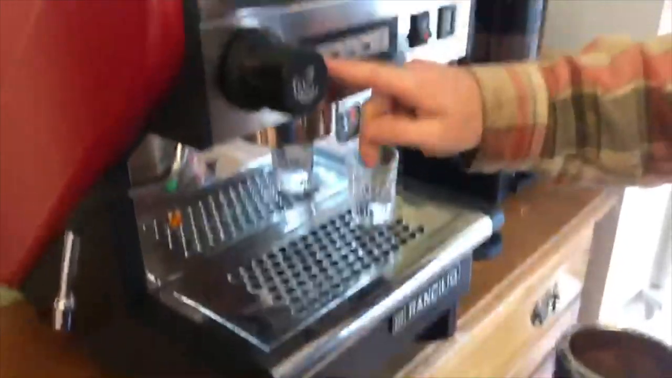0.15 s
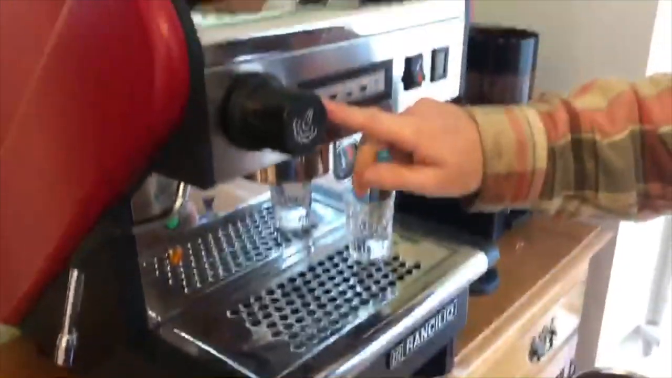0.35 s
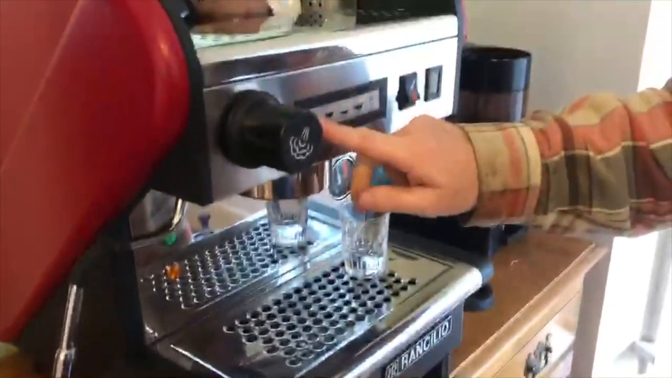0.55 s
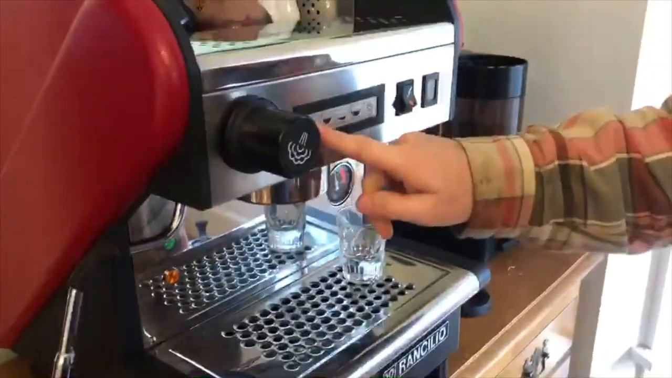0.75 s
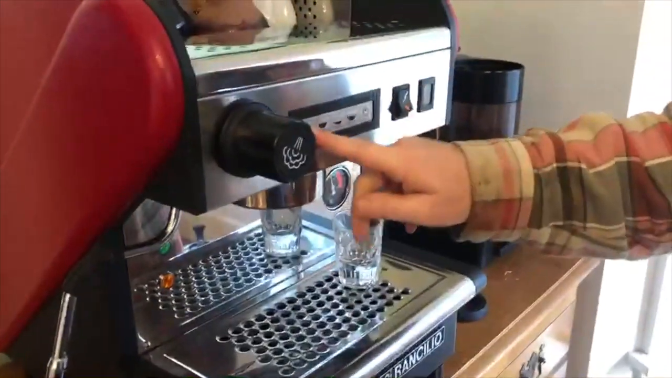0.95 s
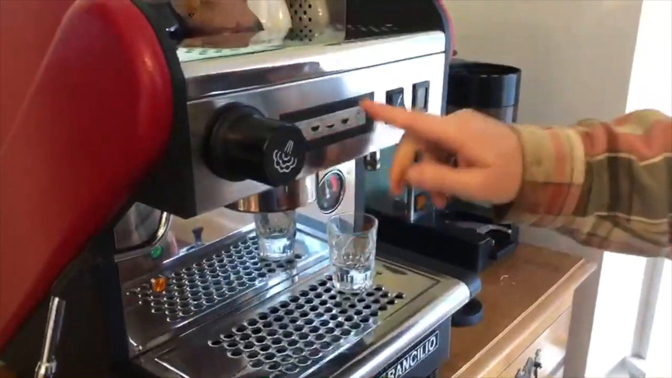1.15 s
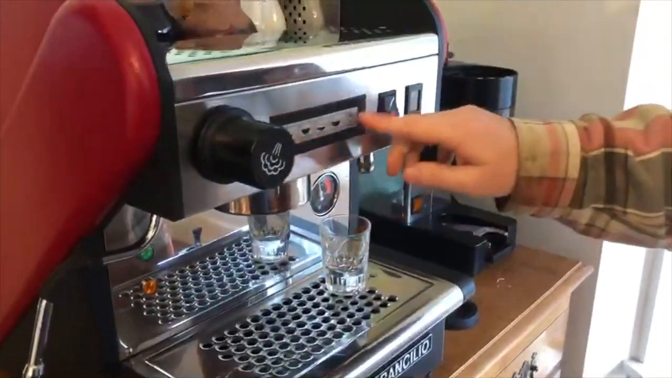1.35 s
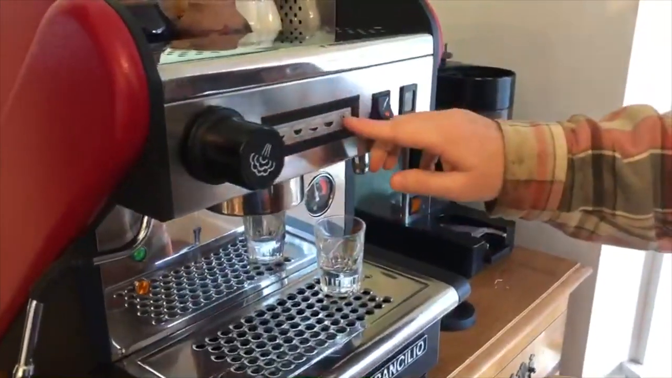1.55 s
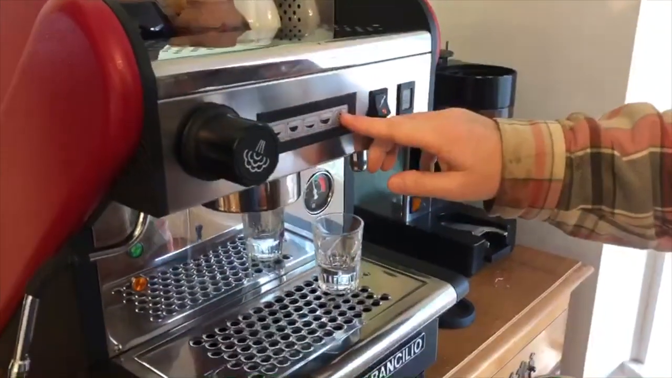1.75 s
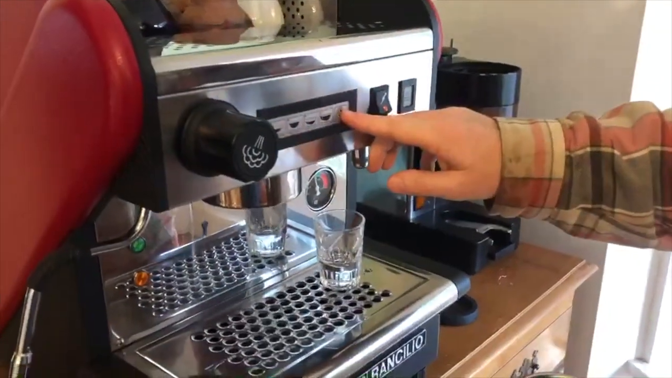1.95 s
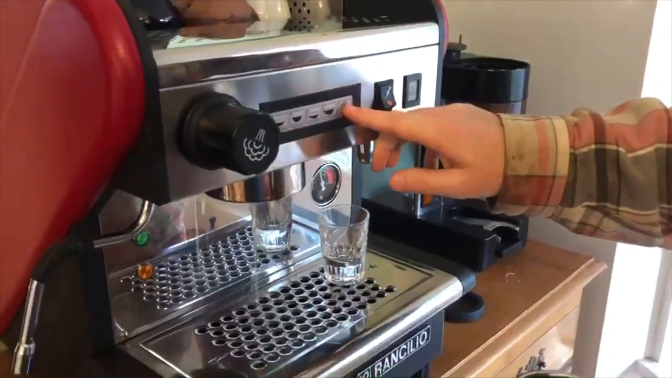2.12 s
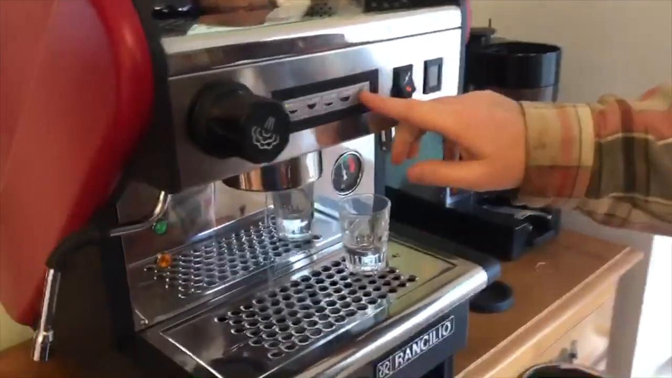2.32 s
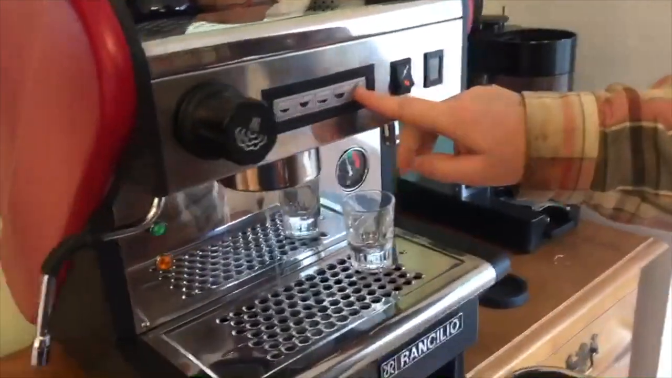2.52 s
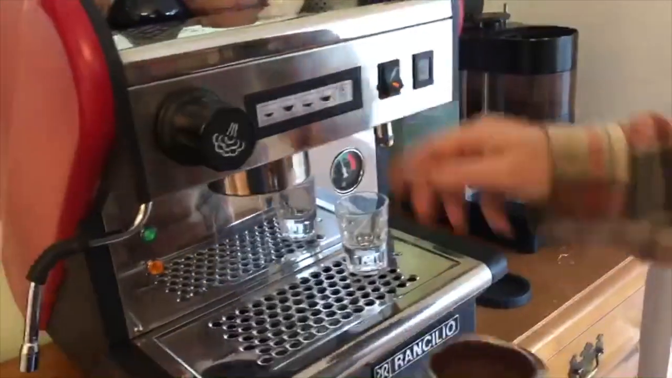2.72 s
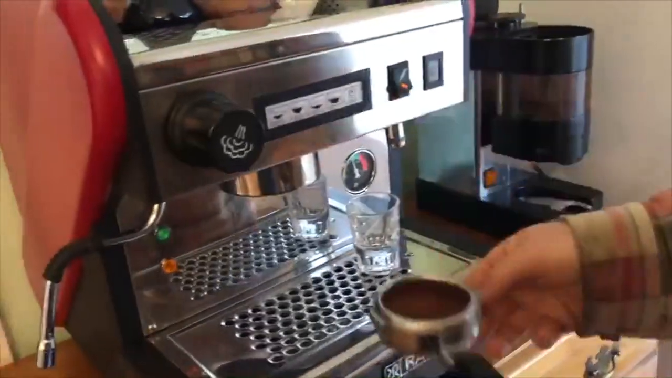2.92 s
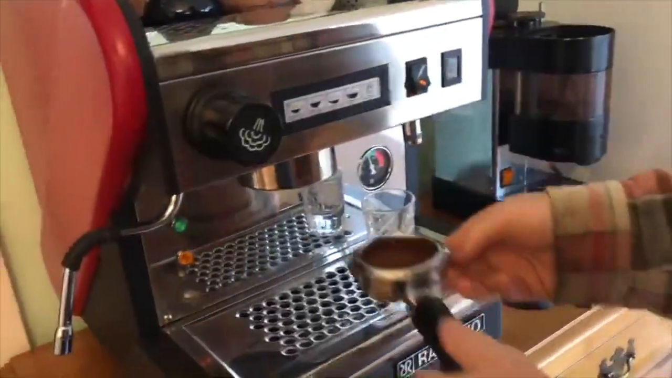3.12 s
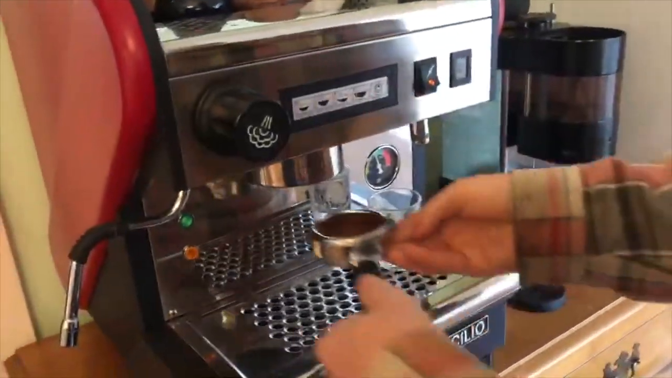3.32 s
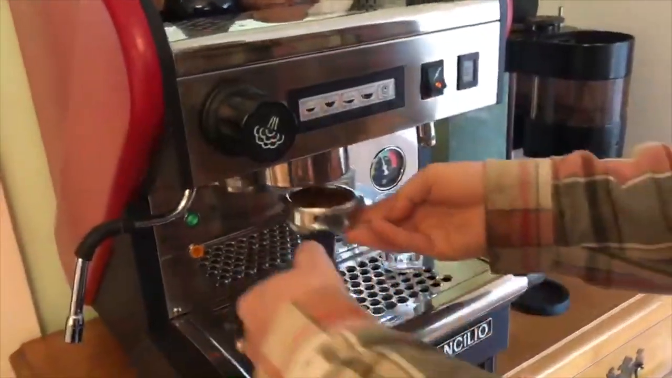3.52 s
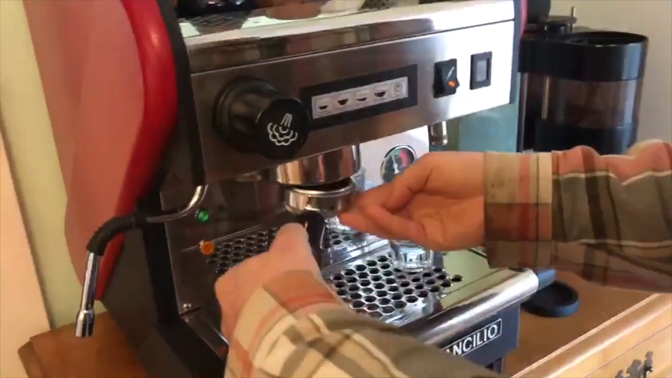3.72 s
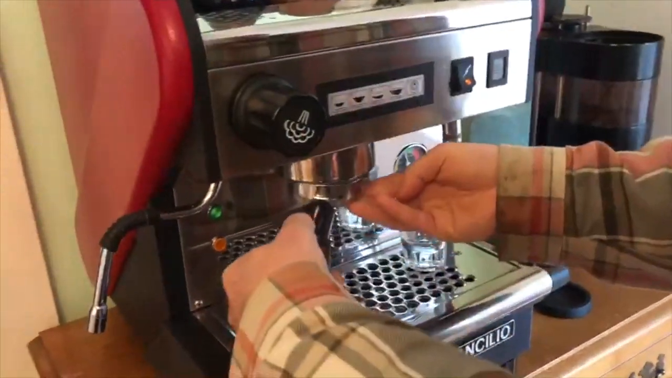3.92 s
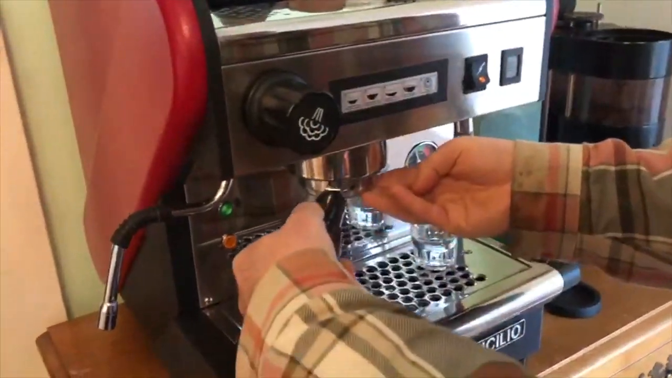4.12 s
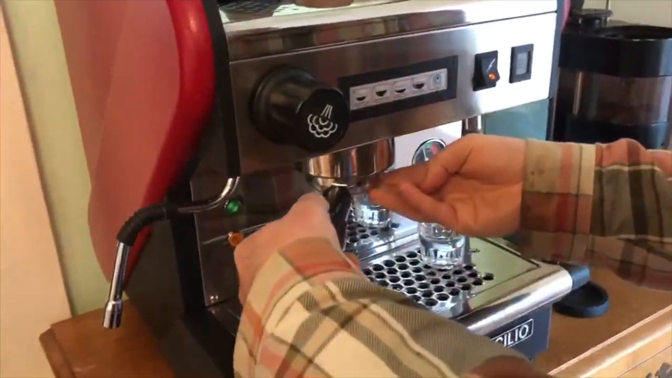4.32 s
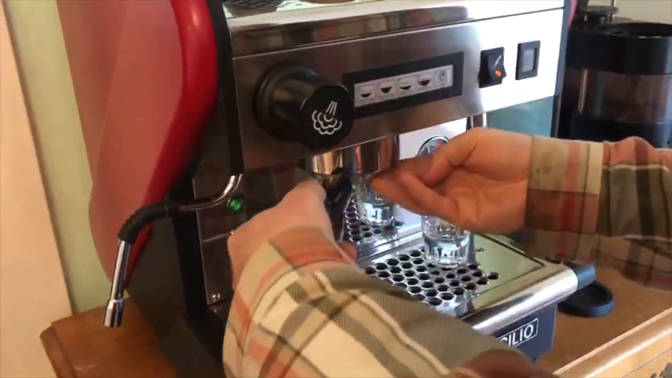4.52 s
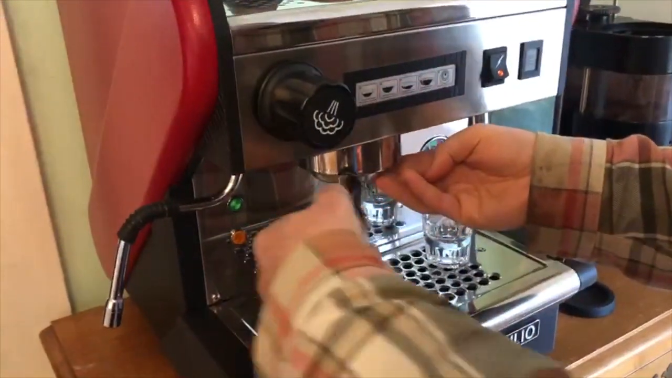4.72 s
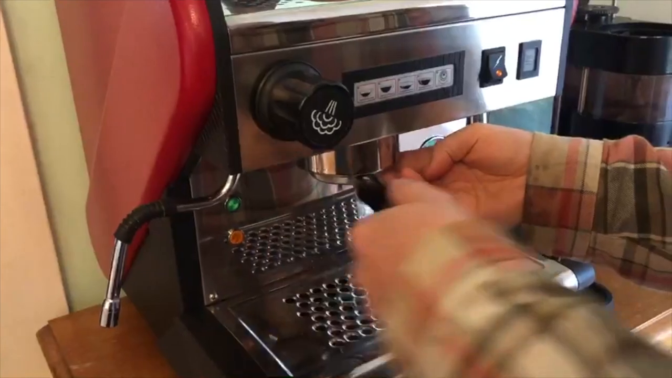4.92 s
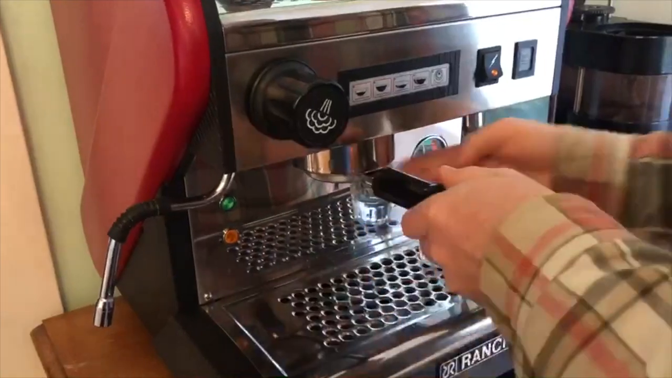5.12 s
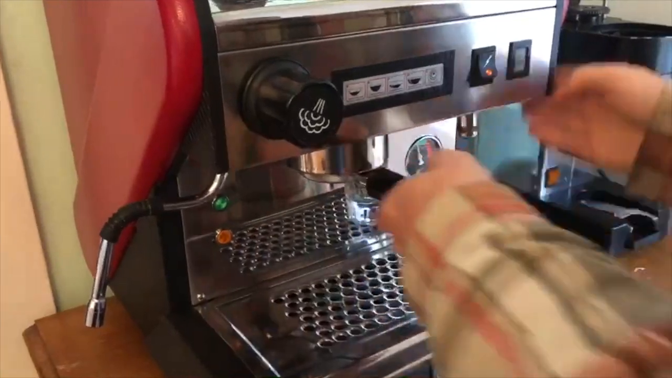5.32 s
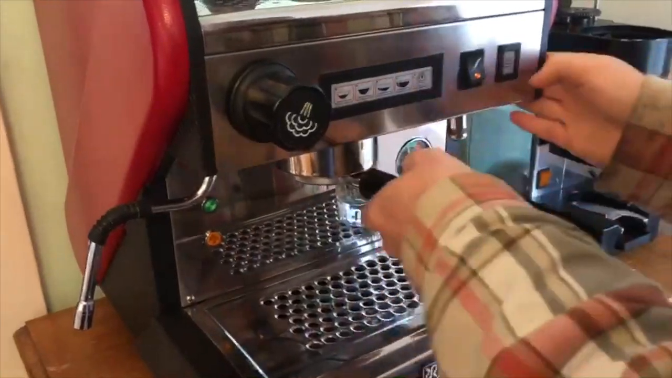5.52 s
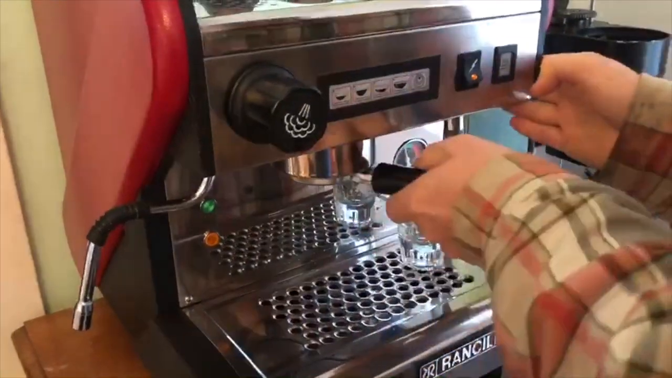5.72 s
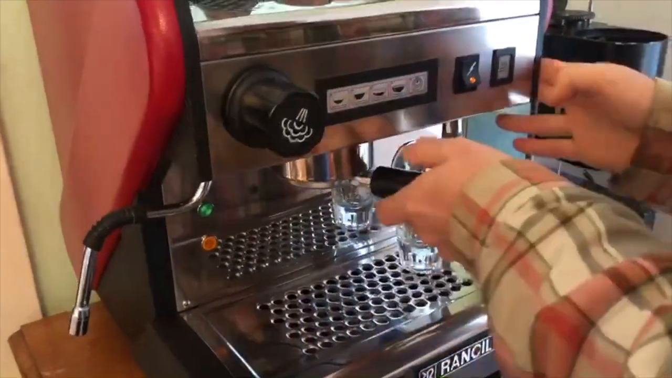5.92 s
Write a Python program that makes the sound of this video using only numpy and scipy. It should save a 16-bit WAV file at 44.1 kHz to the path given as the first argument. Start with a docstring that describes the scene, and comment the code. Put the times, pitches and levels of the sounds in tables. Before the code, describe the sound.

An espresso machine snaps on, its pump humming and water hissing into a glass, then a metal portafilter knocks and twists into place.

```python
"""Espresso machine flush in a small kitchen.

A button and solenoid valve snap. The rotary pump hums and drives water into a glass for under two
seconds, the hiss pulsing with the shaft, then coasts to rest. The portafilter knocks against the
group head and is twisted home, its lugs scraping the gasket. A sleeve brushes past over low room air."""
import sys
import numpy as np
from scipy import signal
from scipy.fft import rfft, irfft, next_fast_len
from scipy.io import wavfile

SR = 44100
rng = np.random.default_rng(int(sys.argv[2]) if len(sys.argv) > 2 else 0)


def log_audio(samples):
    """Write samples as a 16-bit WAV file to the path given in sys.argv[1]."""
    # one column per channel
    frames = np.atleast_2d(samples).T
    # limit to full scale, then quantise
    limited = np.clip(frames, -1, 1)
    pcm = np.round(limited * 32767).astype(np.int16)
    wavfile.write(sys.argv[1], SR, pcm)


N = 267246
TIME_S = np.arange(N) / SR
POWER_ON_S, POWER_OFF_S = 0.80, 2.465
SHAFT_HZ, SPIN_UP_S = 28.55, 0.19
FULL_SPEED_S = POWER_ON_S + SPIN_UP_S

# Pump buzz. Each row: multiple of the shaft rate, relative level in dB.
SHAFT_ORDERS = [(2, -14.5), (3, -22), (4, -21), (7, -12.5), (8, -13.5), (9, -21.5), (10, -18), (11, -18.5),
                (12, -20), (14, -20), (15, -19.5), (16, -26), (17, -28), (18, -18), (20, -18), (21, -20),
                (22, -24), (23, -15.5), (24, -10.5), (25, -17), (26, -17), (27, -24.5), (28, -24.5),
                (30, -19.5), (32, -29.5), (34, -26)]
# Swell of the casing's boom. Each row: time in seconds, level at full speed in dB.
BOOM_ENVELOPE = [(0.98, -37.5), (1.15, -42), (1.48, -40.5), (1.78, -46.5), (2.1, -39), (2.27, -41),
                 (2.52, -38)]
# Magnetic hum and slot whine. Each row: frequency in Hz, level in dB.
MOTOR_TONES = [(120, -54), (1209.7, -59), (1329.7, -48)]

# Impacts. Each row: start in seconds, resonance of the struck spot in Hz, strength in dB,
# treble tilt in dB per octave, extra thud in dB.
SWITCH_HITS = [(0.7975, 8800, -38.5, 2.5, -12.5), (0.8006, 2202, -46, -0.5, -3), (0.813, 850, -47, -3, 4),
               (2.2228, 6340, -67.5, 4.5, -8), (2.479, 2040, -49, -11, -6), (2.630, 12000, -81, 3.5, -3.5),
               (2.6435, 8500, -83.5, 6, -6)]
PORTAFILTER_HITS = [(0.003, 183, -70, -6, 14.5), (0.272, 1103, -66.5, -3, 5.5),
                    (3.7975, 3660, -38.5, -3, -5), (4.1105, 726, -44.5, -7, -3),
                    (4.265, 535, -48, -7.5, -4.5), (4.365, 406, -60.5, -9, 4.5),
                    (4.4605, 3340, -41, -2, -1), (4.494, 202, -47.5, -20, 8), (4.535, 635, -54, -5, 7),
                    (4.669, 3400, -65, -4, 9), (4.706, 3400, -49.5, -5.3, 3.5),
                    (4.806, 5140, -48, -1.57, -4), (4.9275, 3770, -48, -1.57, -5),
                    (5.045, 1570, -73, 0.5, 12), (5.523, 1720, -54, -4, -6.5),
                    (5.565, 14000, -78.5, 1.5, -6), (5.650, 320, -63.5, -4, 8.5),
                    (5.685, 1900, -61, -2.6, 2.5), (5.731, 252, -69, -3.5, 11.5),
                    (5.851, 900, -64, -4.5, -2), (5.990, 348, -59, -5.5, 5)]
# Impact bands: thud, body, ring, tick. Each row: lower edge in Hz, upper edge in Hz.
IMPACT_BANDS_HZ = [(100, 400), (400, 1500), (1500, 5000), (5000, 16000)]
# Ringing of the struck parts. Each row: frequency in Hz, relative level in dB, T60 in seconds.
SOLENOID_MODES = [(230.5, 3.5, 0.44), (628, -5.5, 0.19), (842, -3, .27), (1740, -9, 0.3),
                  (2140, -1.5, 0.056), (2420, -4, 0.18), (3230, -23, .3), (6360, -8.5, .16),
                  (7900, -7.5, 0.13)]
GROUP_HEAD_MODES = [(200.2, -2.5, .26), (225.8, -4.5, 0.35), (333.5, -14, .5), (442, -9.5, 0.65),
                    (469, -10.5, 1), (524.5, -7, 0.56), (638, 1, 0.27), (665, -5, .45), (726, -8.5, .5),
                    (860, -6.5, .38), (1050, -4, 0.19), (1200, -10, 0.28), (1594, -11, 0.36),
                    (1670, -16, 0.19), (2120, -12, 0.32), (2330, -11, 0.26), (2820, -13, 0.28),
                    (3560, -23, 0.51), (4740, -28, .16), (5630, -30, 0.2)]
# Kitchen reverberation. Each row: frequency in Hz, T60 in seconds.
KITCHEN_T60 = [(150, 1), (500, 1), (1200, 0.57), (3000, 0.33), (7000, 0.27), (14000, 0.15)]

# Noise bursts. Each row: start in seconds, length in seconds, level in dB.
SPIT_BURSTS = [(0.925, 0.13, -47), (1.146, 0.023, -45.5), (1.205, 0.058, -53), (1.636, 0.017, -48),
               (1.80, 0.039, -48), (2.155, 0.069, -48.5)]
SQUIRT_BURSTS = [(2.524, 0.04, -58.5)]
SCRAPE_BURSTS = [(4.76, 0.052, -63), (4.83, 0.12, -64), (4.95, 0.17, -69.5)]
SLEEVE_BURSTS = [(0.34, 0.12, -66), (2.6, 1.42, -70), (3.9, 0.53, -79), (5.15, 0.3, -61), (5.58, 0.22, -65),
                 (5.88, 0.27, -68.5)]
RUSTLE_BURSTS = [(0.07, .15, -65.5)]

# Damped resonances. Each row: frequency in Hz, width in Hz, lift in dB.
PIPE_RESONANCES = [(1960, 43, 6), (4060, 27, 7.5), (4980, 120, 4.5), (5410, 110, 9), (5630, 70, 6),
                   (5950, 110, 5), (6580, 200, 5.5), (7070, 80, 8), (9460, 360, 7), (10870, 300, 4.5),
                   (15200, 140, 5)]
GLASS_RESONANCES = [(1940, 110, 6), (2524, 67, 11), (3450, 440, 4)]
VALVE_RESONANCES = [(2110, 100, 4.5), (3310, 250, 6.5), (6360, 220, 5), (8310, 240, 7), (9340, 240, 6.5),
                    (10400, 200, 6), (11950, 320, 5.5), (14200, 220, 6), (14900, 410, 11), (15480, 220, 8)]
BRASS_RESONANCES = [(1570, 22, 4), (1786, 54, 3), (2270, 54, 2), (2565, 110, 8.5), (2890, 220, 10),
                    (3250, 600, 7), (3830, 240, 3), (4940, 67, -5), (5220, 180, 6.5), (5700, 110, 4),
                    (5860, 88, 0), (6300, 200, -1.5), (8370, 220, 5), (11500, 710, 5.5)]

# Noise spectra. Each row: frequency in Hz, relative spectral density in dB.
RUMBLE_SPECTRUM = [(25, -40), (42, -25.5), (60, 1.5), (80, 1), (105, -6), (150, 2.5), (200, 2.5), (300, -3),
                   (480, -9), (680, -11), (1000, -10.5), (1500, -27.5), (2500, -55)]
HISS_SPECTRUM = [(600, -5.5), (1400, 6), (2200, -3.5), (3400, -4.5), (4400, -6.5), (5400, -6), (6300, -10),
                 (8800, -11), (10100, -15.5), (13000, -15.5), (16000, -14.5)]
SPLASH_SPECTRUM = [(800, -2), (2000, 2), (2600, 0.5), (3500, -0.5), (4500, -16), (9000, -54)]
SQUIRT_SPECTRUM = [(3000, -25), (4700, -12), (5100, 6), (6100, -6), (7200, -12), (10000, -32)]
VALVE_SPECTRUM = [(59, -49), (100, -18.5), (219, 2.5), (358, -23), (872, -7.5), (1130, -12.5), (1680, -8.5),
                  (2320, -4.5), (2520, -12.5), (3320, -11.5), (4470, -23), (6150, -11.5), (7450, -18),
                  (8280, -7.5), (16000, -10)]
GROUP_HEAD_SPECTRUM = [(60, -43), (100, -12.5), (160, -10.5), (205, 1.5), (370, -18), (630, -10),
                       (850, -14.5), (2000, -21), (3800, -27.5), (6500, -40.5), (9500, -50.5), (15500, -51)]
SCRAPE_SPECTRUM = [(700, -1), (1600, -2), (3500, -15), (5500, -1.5), (7200, -9), (8400, -8), (9500, -19),
                   (16000, -13)]
CLOTH_SPECTRUM = [(500, 3), (1500, 3.5), (3500, 7), (7000, 0), (16000, -3)]
RUSTLE_SPECTRUM = [(800, -9), (2700, 2), (4500, -6), (8000, -20)]
AIR_SPECTRUM = [(15, -33), (25, -15), (70, 0.5), (166, -0.5), (242, -3.5), (560, -15), (607, -15.5),
                (677, -16), (840, -16.5), (1230, -20.5), (2050, -26.5), (2610, -28.5), (4030, -33),
                (14800, -39), (16000, -40.5)]


def pump(boom_order=5, flutter=0.33, pressure_db_per_s=2.5):
    """Shaft orders flutter as the vanes load unevenly; one meets a casing resonance and booms."""
    speed, flow = shaft_speed(), water_flow()
    turns = np.cumsum(SHAFT_HZ * speed * (1 + 0.0012 * drift(12))) / SR
    slip = 1 - speed  # below full speed the orders fall off the casing's resonances
    boom_db = np.interp(TIME_S, *np.transpose(BOOM_ENVELOPE)) + 2.5 * drift(25.9) - 150 * slip
    boom = amp(boom_db) * np.sin(2 * np.pi * (boom_order * turns + 0.1 * drift(23)))
    buzz = np.zeros(N)
    for order, db in SHAFT_ORDERS:
        vane_load = 1 + flutter * drift(18)
        buzz += amp(db) * vane_load * np.sin(2 * np.pi * (order * turns + rng.random()))
    back_pressure_db = pressure_db_per_s * (np.clip(TIME_S, POWER_ON_S, POWER_OFF_S) - POWER_ON_S)
    buzz *= flow * amp(-45 + back_pressure_db - 40 * slip)
    rumble = amp(-46) * speed * np.sqrt(flow) * noise(RUMBLE_SPECTRUM, N)
    return np.sqrt(2) * (boom + buzz) + rumble


def shaft_speed(half_speed_s=0.39):
    """Fraction of full speed: the motor eases up, holds, coasts down."""
    to_go = 1 - np.clip((TIME_S - POWER_ON_S) / SPIN_UP_S, 0, 1)
    off_s = np.maximum(TIME_S - POWER_OFF_S, 0)
    return (1 - to_go ** 2) / (1 + (off_s / half_speed_s) ** 2)


def motor_whine(rise_s=0.046, t60_s=0.28, waver=0.055):
    """Mains hum and rotor-slot tones come in near full speed and die in the room at power-off."""
    onset = np.clip(1 + (TIME_S - FULL_SPEED_S) / rise_s, 0, 1)
    decay = amp(-60 * np.maximum(TIME_S - POWER_OFF_S, 0) / t60_s)
    tones = sum(amp(db) * (1 + waver * drift(11.9)) * np.sin(2 * np.pi * (hz * TIME_S + rng.random()))
                for hz, db in MOTOR_TONES)
    return onset * decay * np.sqrt(2) * tones


def water_flow(open_s=0.06, drain_s=0.11):
    """Fraction of full flow: the valve opens, the pump holds it, the line drains."""
    opening = np.clip((TIME_S - POWER_ON_S) / open_s, 0, 1)
    return opening / (1 + np.maximum(TIME_S - POWER_OFF_S, 0) / drain_s) ** 2


def water_hiss(pulse_db=1.0, flicker_db=1.0):
    """Water hisses through the valve, pulses once per shaft turn and excites the narrow pipes."""
    turns = np.cumsum(SHAFT_HZ * shaft_speed()) / SR
    level_db = -52.5 + pulse_db * np.sin(2 * np.pi * turns) + flicker_db * drift(130)
    return water_flow() * amp(level_db) * noise(HISS_SPECTRUM, N, PIPE_RESONANCES)


def water_spits(dribbles_per_s=5, dribble_s=0.028, slots=24):
    """Large spits and loosely spaced dribbles excite the hollow of the glass."""
    starts_s = FULL_SPEED_S + (np.arange(slots) + rng.random(slots)) / dribbles_per_s
    levels_db = rng.normal(-52, 2, slots)
    dribbles = [(s, dribble_s, db) for s, db in zip(starts_s, levels_db) if s < POWER_OFF_S]
    return bursts(SPIT_BURSTS + dribbles, SPLASH_SPECTRUM, rise=0.08, grain_db=2, peaks=GLASS_RESONANCES)


def valve_squirt():
    """The valve vents its pressure, exciting the pipes."""
    return bursts(SQUIRT_BURSTS, SQUIRT_SPECTRUM, rise=0.088, grain_db=3.5, peaks=PIPE_RESONANCES)


def switch_snaps():
    """Hard, bright snaps of the button and solenoid valve."""
    def snap(spot):
        return impact(VALVE_SPECTRUM, VALVE_RESONANCES + [spot], SOLENOID_MODES,
                      modes_db=-12, crack_s=0.0045, ring_s=0.014, ring_db=-25.5, room_db=-14.5)
    return strikes(SWITCH_HITS, snap, spot_db=5, spot_q=5, ring_band_db=-1.5)


def portafilter_knocks():
    """Brass lugs knock on the group head and shake the casing."""
    def knock(spot):
        return impact(GROUP_HEAD_SPECTRUM, BRASS_RESONANCES + [spot], GROUP_HEAD_MODES,
                      modes_db=-4, crack_s=0.0071, ring_s=0.012, ring_db=-20.5, room_db=-13)
    return strikes(PORTAFILTER_HITS, knock, spot_db=10.5, spot_q=5.8, ring_band_db=1.73)


def strikes(hits, response, spot_db, spot_q, ring_band_db, gain_db=-1):
    """Each contact rings its own spot; a harder one tilts the treble up, a heavier one adds thud."""
    centres_hz = np.sqrt(np.prod(IMPACT_BANDS_HZ, axis=1))
    octaves_above_body = np.maximum(np.log2(centres_hz / centres_hz[1]), 0)
    out = np.zeros(N)
    for start_s, spot_hz, strength_db, tilt_db_per_oct, thud_db in hits:
        sound = response((spot_hz, spot_hz / spot_q, spot_db))
        levels_db = strength_db + tilt_db_per_oct * octaves_above_body + [thud_db, 0, ring_band_db, 0]
        for db, edges_hz in zip(levels_db, IMPACT_BANDS_HZ):
            band = signal.sosfilt(signal.butter(3, edges_hz, "band", fs=SR, output="sos"), sound)
            attack_rms = np.std(band[:SR // 14])
            add(out, start_s, amp(db) * band / attack_rms)
    return amp(gain_db) * out


def impact(spectrum, peaks, modes, modes_db, crack_s, ring_s, ring_db, room_db):
    """One blow: a crack, dense casing ring, a few clear modes and the kitchen's tail."""
    t = np.arange(2 ** 15) / SR
    bins_hz = np.fft.rfftfreq(len(t), 1 / SR)
    bins = np.exp(2j * np.pi * rng.random(len(bins_hz))) * amp(log_interp(spectrum, bins_hz))
    centres_hz = np.geomspace(100, 16000, 9)
    clatter = np.zeros(len(t))
    for hz, weights in zip(centres_hz, np.eye(len(centres_hz))):
        band = irfft(bins * np.interp(bins_hz, centres_hz, weights))
        onset = 1 - np.exp(-t * hz / 1.7)
        stretch = (2000 / hz) ** 0.71  # low bands linger
        crack = np.exp(-t / (crack_s * stretch))
        ring = amp(ring_db) * np.exp(-t / ring_s)
        tail = amp(room_db - 60 * t / log_interp(KITCHEN_T60, hz))
        clatter += band * unit_rms((crack + ring + tail) * onset)
    clatter += sum((amp(db) - 1) * signal.lfilter(*signal.iirpeak(hz, 2 * hz / width_hz, SR), clatter)
                   for hz, width_hz, db in peaks)
    tones = np.zeros(len(t))
    for hz, db, t60_s in modes:
        contact_db = rng.normal(0, 3.5)  # each contact point favours other modes
        envelope = amp(db + contact_db - 60 * t / t60_s) * (1 - np.exp(-t * hz))
        tones += envelope * np.sin(2 * np.pi * (hz * t + rng.random()))
    return unit_rms(clatter) + amp(modes_db) * unit_rms(tones)


def gasket_scrape():
    """Brass lugs slide on the gasket as the handle turns."""
    return bursts(SCRAPE_BURSTS, SCRAPE_SPECTRUM, rise=0.5, grain_db=-0.5, peaks=BRASS_RESONANCES)


def sleeve():
    """Cloth brushes past; a soft rustle as the hand reaches for the button."""
    brushing = bursts(SLEEVE_BURSTS, CLOTH_SPECTRUM, rise=0.25, grain_db=1.5)
    rustle = bursts(RUSTLE_BURSTS, RUSTLE_SPECTRUM, rise=0.42, grain_db=3)
    return brushing + rustle


def room_air(level_db=-61):
    """Steady low murmur of kitchen air."""
    return amp(level_db) * noise(AIR_SPECTRUM, N)


def bursts(rows, spectrum, rise, grain_db, peaks=()):
    """Triangular swells of grainy noise; rise is a fraction of each length."""
    out = np.zeros(N)
    for start_s, length_s, db in rows:
        progress = np.linspace(0, 1, int(length_s * SR))
        swell = np.interp(progress, [0, rise, 1], [0, 1, 0])
        add(out, start_s, amp(db) * swell * noise(spectrum, len(swell), peaks))
    return out * amp(grain_db * drift(160))


def noise(spectrum, samples, peaks=()):
    """Unit-rms noise with the given spectrum and resonances."""
    n = next_fast_len(samples)
    bins_hz = np.fft.rfftfreq(n, 1 / SR)
    lift_db = sum(db / (1 + (2 * (bins_hz - hz) / width_hz) ** 2) for hz, width_hz, db in peaks)
    gain = amp(log_interp(spectrum, bins_hz) + lift_db)
    return unit_rms(irfft(rfft(rng.standard_normal(n)) * gain, n)[:samples])


def drift(rate_hz):
    """Unit Gaussian values at rate_hz, joined by straight lines."""
    return np.interp(TIME_S * rate_hz, np.arange(1024), rng.standard_normal(1024))


def log_interp(points, hz):
    """Curve value on a log-frequency axis."""
    points_hz, values = np.transpose(points)
    return np.interp(np.log(hz + 1), np.log(points_hz + 1), values)


def amp(db):
    """Decibels to gain."""
    return 10 ** (np.asarray(db) / 20)


def unit_rms(x):
    """Scale to rms 1."""
    return x / np.sqrt(np.mean(x ** 2) + 1e-20)


def add(mix, start_s, sound):
    """Mix a sound in at start_s."""
    part = mix[round(start_s * SR):][:len(sound)]
    part += sound[:len(part)]


def scene():
    """Water, friction, machine and knocks over room air; mono."""
    splashes = water_spits() + valve_squirt()
    friction = gasket_scrape() + sleeve()
    machine = switch_snaps() + pump() + motor_whine() + water_hiss()
    return (splashes + friction + machine + portafilter_knocks() + room_air())[None]


def record(dry, cutoff_hz=15950):
    """Steep low-pass on the mix."""
    lowpass = signal.firwin(401, cutoff_hz, window=("kaiser", 9), fs=SR)
    return signal.oaconvolve(dry, lowpass[None], "same")


dry = scene()
out = record(dry)
log_audio(out)
```